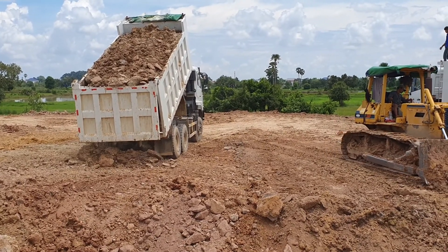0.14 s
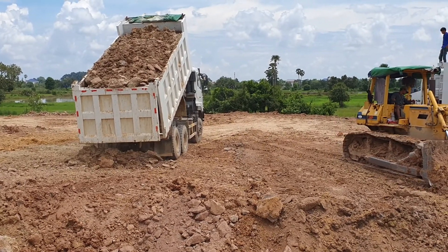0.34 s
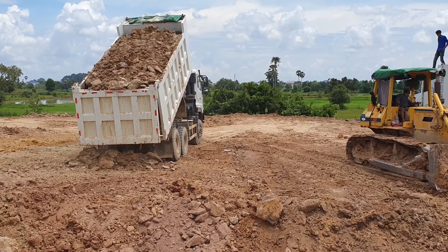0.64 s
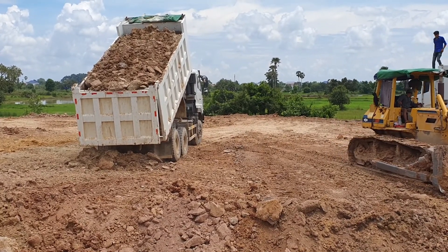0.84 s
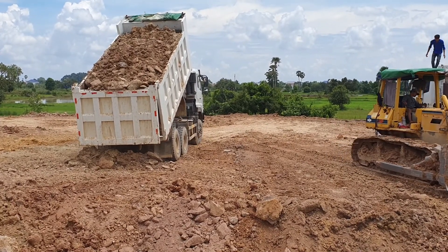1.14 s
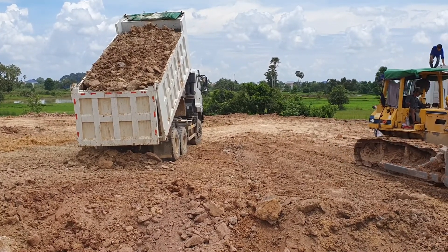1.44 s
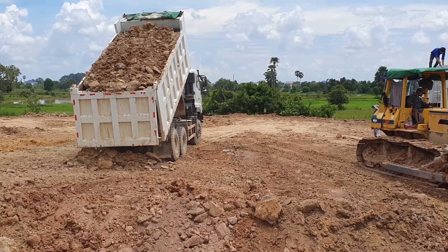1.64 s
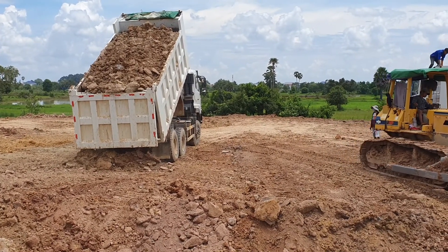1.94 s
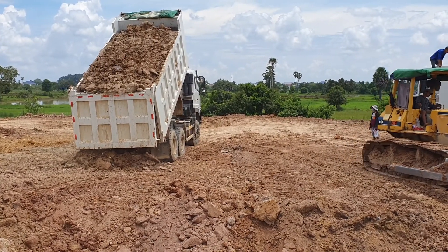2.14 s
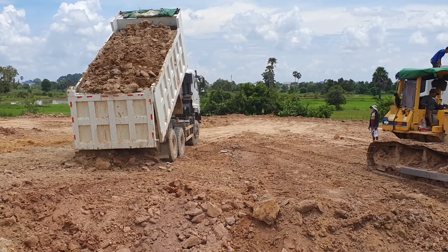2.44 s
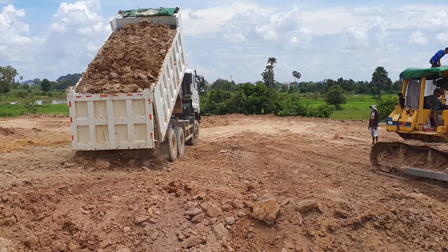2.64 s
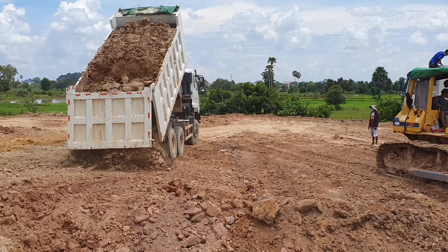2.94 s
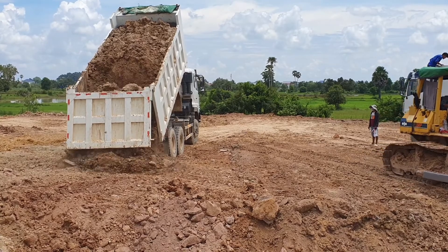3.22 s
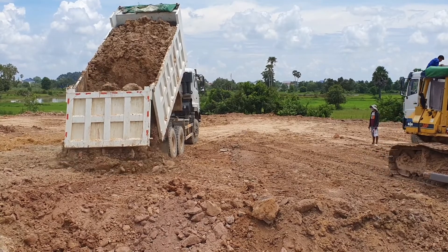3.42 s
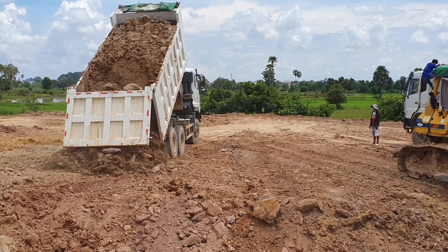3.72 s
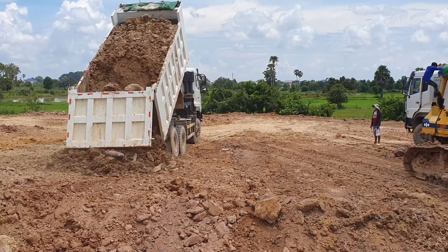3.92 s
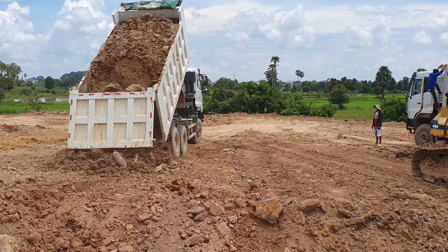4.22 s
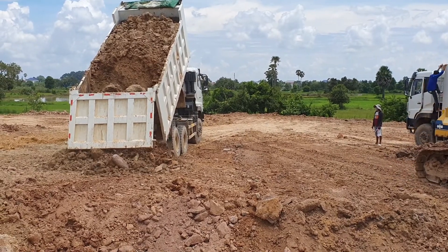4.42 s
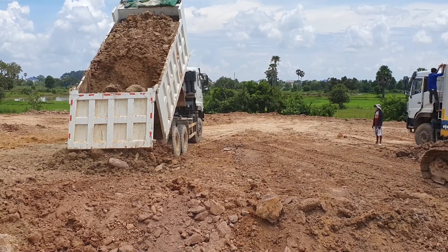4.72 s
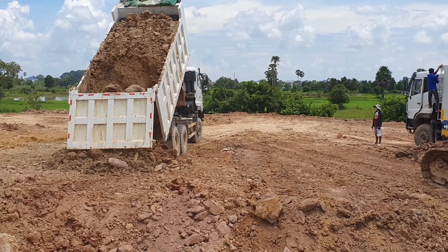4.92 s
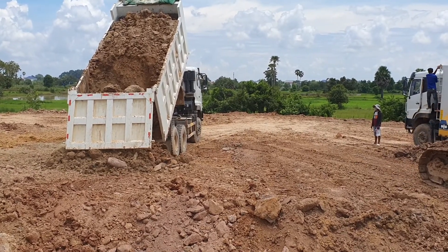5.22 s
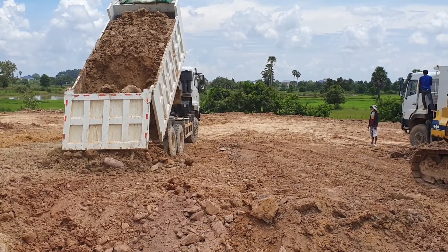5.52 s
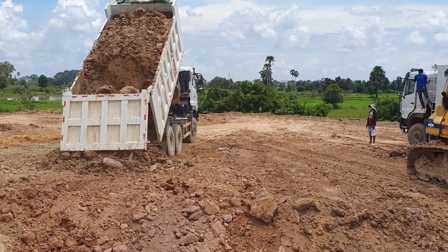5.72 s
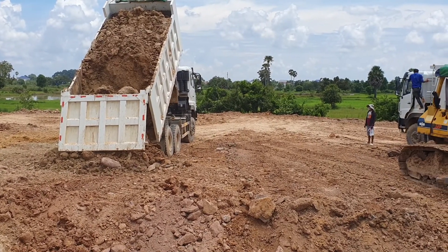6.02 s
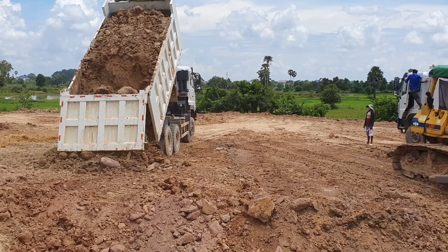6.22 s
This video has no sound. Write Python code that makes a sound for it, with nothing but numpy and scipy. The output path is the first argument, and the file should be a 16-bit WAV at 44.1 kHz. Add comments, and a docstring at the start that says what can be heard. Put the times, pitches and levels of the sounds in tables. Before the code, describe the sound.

Steady diesel drone on an open dirt field: low exhaust boom, rough bark, clatter and light hiss from a crawler, with a tipper truck's rumble and faint whine underneath. Revs creep up, the boom cuts out and the pitch slides down, then the note returns abruptly and climbs gradually. Faint dry track whistles, a few dull clanks and tiny gritty scrapes are mixed in. Stereo pickup, dry, with faint treble noise.

```python
"""A bulldozer's six-cylinder diesel drones on an earth fill while a tipper truck runs beside it.
Its throttle shuts and it runs down almost without exhaust note as it turns away; then it picks up under load.
Speed, fuel and heading set the bark, roar and clatter; overtones sweep through pipe and panel resonances.
The truck is rumbling noise with a drone and a whine; the tracks whistle by stick-slip, clank and scrape.
All is in the open air, with only weak, close reflections, over a faint treble noise floor."""
import sys
import numpy as np
from scipy.fft import rfft, irfft, next_fast_len
from scipy.io import wavfile
from scipy.ndimage import uniform_filter1d, minimum_filter1d, map_coordinates

SR = 44100
rng = np.random.default_rng(int(sys.argv[2]) if len(sys.argv) > 2 else 0)


def pcm_store(signal):
    """Save signal as 16-bit PCM."""
    levels = np.round(np.clip(np.atleast_2d(signal), -1, 1) * 32767)
    wavfile.write(sys.argv[1], SR, levels.astype(np.int16).T)


N = 280476

# Spectra of the noises, relative levels: frequency_hz, level_db
TREBLE_FLOOR_SPECTRUM = [(7000, -6.5), (8300, -3), (9200, -4), (11300, -6), (12600, -0.5), (14500, -3.5),
                         (15700, -2.5)]
TRUCK_SPECTRUM = [(20, -28), (36, -5), (52, -7.5), (78, 2), (110, -12), (150, -10.5), (220, -12.5),
                  (330, -21)]
LINK_SPECTRUM = [(300, -18), (600, -4), (900, 8), (1300, 2), (2000, -0.5), (3200, -17), (6000, -31),
                 (12000, -40)]
GRIT_SPECTRUM = [(700, -6), (1500, 6), (2300, -2), (3100, 6), (4200, -9), (5300, -10), (6300, 0),
                 (7050, 4.5), (7700, -25), (10000, -17), (15000, -26)]
ROAR_SPECTRUM = [(150, -1.5), (200, -0.5), (250, -2.5), (280, -3.5), (325, -2), (385, -7), (490, -6.5),
                 (560, -6), (750, -9.5), (1000, -16), (1400, -38)]
CLATTER_SPECTRUM = [(700, -15), (1050, -3.5), (1250, -0.5), (1550, -8), (2000, -3), (2300, -11), (2900, -5),
                    (3800, -9.5), (4500, -14.5), (5300, -20.5), (8000, -40)]
HISS_SPECTRUM = [(4000, -12), (5200, -12.5), (6000, -2), (6900, -1), (7600, -8.5), (8400, -19),
                 (11000, -14)]

# Likeness of the two microphones' noise: frequency_hz, correlation (no unit)
LIKENESS = [(200, 1), (400, 0.94), (600, 0.85), (1300, 0.58), (2300, 0.043), (3600, 0.14), (7000, 0.059),
            (14000, 0.12)]
# Balance of the two microphones: frequency_hz, left_minus_right_db
BALANCE = [(60, 2), (110, -2.5), (200, -0.5), (380, 0), (700, -2.0), (1290, -3), (2380, 0), (4400, -7),
           (8120, -1), (15000, -0.5)]
# Later arrival of truck, exhaust and panels at the left microphone: frequency_hz, lag_ms
LOW_LAG = [(80, 0.46), (160, 0.21), (400, 0.32)]

# Clanks of the track links, relative levels: start_s, level_db
CLANKS = [(.468, -26), (.828, -28), (3.167, -27), (3.763, -26), (4.005, -26), (5.938, -21), (6.116, -18.5)]
# Steel grinding over grit, relative levels: centre_s, half_length_s, level_db
SCRAPES = [(2.12, 0.012, -39), (2.743, 0.013, -30), (6.008, 0.022, -46)]
# Whistles of the track pins, relative levels: start_s, length_s, starting_pitch_hz, level_db
SQUEALS = [(2.12, .048, 8020, -37), (2.261, .07, 3920, -42), (2.462, .07, 3990, -42),
           (2.763, .064, 8060, -38), (3.16, .08, 4000, -41.5), (4.16, .07, 4000, -43),
           (4.26, .11, 4010, -39), (4.456, .14, 4015, -40), (4.68, .14, 4010, -43), (5.65, .041, 8000, -46),
           (5.701, .14, 3868, -35), (5.97, .098, 3908, -31.5), (6.085, .055, 3940, -38),
           (6.138, .145, 3893, -34.5), (6.283, .09, 3848, -32)]
# Direction of the whistles: pitch_hz, left_minus_right_db
SQUEAL_PAN = [(4000, -6.5), (8000, -10)]
RANDOM_CLANK_DB = -26  # relative, on the scale of CLANKS
SAG_HZ_PER_S = 210  # a squeal sinks as the pin slides

# Resonances of body panels: centre_hz, width_hz, peak_db
PANELS = [(271.5, 10.7, -25.5), (336.9, 8.3, -26.5), (383, 19, -34.5), (601, 11, -32)]
# Engine shake that drives the panels: multiple_of_firing_rate, level_db
PANEL_DRIVE = [(4, 0), (5, -4), (7, -3)]
# Resonances of the engine casing, relative levels: centre_hz, width_hz, peak_db
CASING = [(1184, 66, -5), (1306, 54, -2.5), (1908, 128, -3), (3100, 110, -16)]
# Resonances of the exhaust pipe: centre_hz, width_hz, gain_far_below_centre_db
PIPE = [(174.3, 29, -3), (393, 51, -20), (569, 45, -35.5)]
# Exhaust overtones, thirds from unequal cylinders: multiple_of_firing_rate, level_db
OVERTONES = [(4 / 3, -14), (5 / 3, -9), (2, 0), (7 / 3, -9), (8 / 3, -13), (3, -1), (4, -1), (5, 0),
             (6, -3), (7, -3)]
# Uneven beat of unequal cylinders: multiple_of_firing_rate, level_re_boom_db
LOPE = [(2 / 3, -26.5), (5 / 6, -29)]

# Engine speed at work, running down and picking up: time_s, firings_per_s
SPEED = [(0, 81.2), (.4, 79.6), (.9, 79.7), (1.1, 78.2), (1.7, 81.7), (2, 79), (2.4, 83), (3.2, 87.5),
         (3.5, 88), (3.75, 76), (4.05, 67.5), (4.38, 55.5), (4.55, 61.7), (4.8, 68), (5.6, 74.6),
         (6.36, 79)]
# Throttle shut: from_s, to_s
COAST = (3.51, 4.41)
# Engine bay swinging away from the listener: from_s, to_s
TURN = (3.4, 3.5)
# Boom under load before and after the run-down, relative levels: time_s, level_db
BOOM_BEFORE = [(0.05, -9), (2.15, -9.5), (2.17, -10.5), (2.88, -8), (3.48, -12.5)]
BOOM_AFTER = [(4.42, -13), (4.462, -7), (4.52, -10), (4.748, -5.5), (6.126, -11), (6.33, -10.5)]
# Courses of the casing's ring and the hiss, relative levels: time_s, level_db
RING_COURSE = [(0.05, -37.5), (0.68, -38), (3.16, -39.5), (3.42, -35), (3.65, -42), (5.82, -56), (5.9, -45)]
HISS_COURSE = [(0.0, -43.5), (1.17, -41.5), (1.31, -43), (2.34, -42), (3.83, -52), (5.1, -45.5),
               (5.24, -48.5), (6.36, -47.5)]
# Level rules: working_speed_db, slope_db_per_octave_of_speed, coasting_change_db, turned_away_change_db
TREBLE_FLOOR_LAW = (-47.5, -5, -2.5, 1)
ROAR_LAW = (-24, 2.5, -0.3, -2.5)
CLATTER_LAW = (-31, -1.5, -1.9, -1)
BARK_LAW = (-30, 1.5, -11, 0.5)  # ahead of the pipe's resonances
WORK_HZ = 80  # working speed, firings per second
SHUT_S, OPEN_S = 0.082, 0.052  # time for the fuel to die away, and to come back
BOOM_LEVEL_DB = 0.28  # constant level added to the boom's course
TOP_HZ = 15700  # upper band limit of the recorder


def amp(db):
    """Logarithmic levels: decibels become a linear gain."""
    return 10 ** (np.asarray(db) / 20)


def unit(x):
    """Normalization: scale to rms 1."""
    return x / np.sqrt(np.mean(x ** 2) + 1e-20)


def clock():
    """Sampling: the time of each sample in seconds."""
    return np.arange(N) / SR


def ramp(start, length):
    """Linear transition: rises from 0 to 1 over a stretch of time."""
    return np.clip((clock() - start) / length, 0, 1)


def along(points, hz):
    """Interpolation of (frequency_hz, value) points on a logarithmic frequency axis."""
    point_hz, value = np.transpose(points)
    return np.interp(np.log(hz + 1), np.log(point_hz + 1), value)


def curves(rows):
    """Interpolation in time: one value per sample for each column after the time."""
    s, *columns = np.transpose(rows)
    return [np.interp(clock(), s, column) for column in columns]


def wobble(rate):
    """Slow random modulation: a smooth curve with the given number of knots a second."""
    knots = rng.standard_normal(int(N * rate / SR) + 4)
    return map_coordinates(knots, [clock() * rate])


def filtered(x, response):
    """Linear filtering: the spectrum is multiplied by a response of frequency."""
    m = next_fast_len(N + 8192)
    hz = np.fft.rfftfreq(m, 1 / SR)
    return irfft(rfft(x, m) * response(hz), m)[..., :N]


def shape(points):
    """Spectral envelope: the gain follows the points and falls away outside their ends."""
    low, high = points[0][0], points[-1][0]

    def response(hz):
        skirts = np.minimum(hz / low, 1) ** 2 / np.maximum(hz / high, 1) ** 2
        return amp(along(points, hz)) * skirts
    return response


def resonances(modes, hz):
    """Modal superposition: damped resonances of alternating sign add."""
    total = 0
    for k, (centre, width, db) in enumerate(modes):
        damping = 1j * hz * width
        total = total + (-1) ** k * amp(db) * damping / (centre ** 2 - hz ** 2 + damping)
    return total


def rush(response, drive=1):
    """Partial coherence: driven noise through a response, alike at two microphones by frequency, at rms 1."""
    def middle_and_side(hz):
        angle = np.arccos(np.clip(along(LIKENESS, hz), -1, 1)) / 2
        return response(hz) * np.array([np.cos(angle), np.sin(angle)])

    mid, side = filtered(drive * rng.standard_normal((2, N)), middle_and_side)
    pair = np.array([mid + side, mid - side])
    return unit(filtered(pair, lambda hz: amp(np.outer([.5, -.5], along(BALANCE, hz)))))


def band(centre_hz, width_hz):
    """Narrow-band excitation: noise in one resonance, at rms 1."""
    return rush(lambda hz: 1 / (1 + ((hz - centre_hz) / width_hz) ** 2))


def bounced(x, gain, reach, count=12):
    """Early reflection: ground, blade and tipper body add weak, close copies; the sum has rms 1."""
    delays = rng.uniform(.002, reach, count)
    sizes = gain * rng.standard_normal(count)
    echoes = sum(size * np.roll(x, int(delay * SR), axis=-1) for delay, size in zip(delays, sizes))
    return unit(x + echoes)


def spread(x, lag_ms):
    """Arrival-time difference: sound from the right reaches the left microphone later, by frequency."""
    return filtered(x, lambda hz: np.exp(1j * np.pi * np.outer([-1, 1], hz * lag_ms(hz)) / 1000))


def level(law, state, wander_db):
    """Level scaling: one layer's gain from engine speed, fuel and heading, with a slight random wander."""
    db, octave_db, coast_db, turned_db = law
    speed, fuel, turned = state
    speed_db = octave_db * np.log2(speed / WORK_HZ)
    return amp(db + speed_db + coast_db * (1 - fuel) + turned_db * turned + wander_db * wobble(14))


def treble_floor(state):
    """Level-following noise: a faint treble floor varies with the engine's speed, fuel and heading."""
    noise = rush(shape(TREBLE_FLOOR_SPECTRUM), amp(1.7 * wobble(500)))
    return level(TREBLE_FLOOR_LAW, state, wander_db=2.05) * bounced(noise, gain=0.11, reach=0.0092)


def truck(level_db, drone_db, swell_db, swell_at, swell_s, whine_db):
    """Broadband and resonant radiation: engine rumble, hoist pump whine, a drone swelling near full tilt."""
    drone = amp(drone_db + swell_db * ramp(swell_at, swell_s)) * band(centre_hz=385, width_hz=19.5)
    whine = amp(whine_db) * band(centre_hz=1328, width_hz=9)
    return amp(level_db) * rush(shape(TRUCK_SPECTRUM)) + drone + whine


def tracks(clank_db, t60, scrape_db, count=6):
    """Impact and friction: earth-clogged links clank dully, and now and then grind over a stone."""
    t = clock()
    # further clanks, at one common level, fall at random moments
    clanks = CLANKS + [(s, RANDOM_CLANK_DB) for s in rng.uniform(0, N / SR, count)]
    hits = sum(ramp(s, .001) * amp(db - 60 * np.abs(t - s) / t60) for s, db in clanks)
    strokes = sum(amp(db) / (1 + ((t - s) / half) ** 2) for s, half, db in SCRAPES)
    clanking = amp(clank_db) * hits * rush(shape(LINK_SPECTRUM))
    grinding = amp(scrape_db) * strokes * rush(shape(GRIT_SPECTRUM), amp(2.9 * wobble(320)))
    return clanking + grinding


def squeals(level_db, jitter, octave_db):
    """Stick-slip friction: dry track pins whistle briefly, swell, waver and sag, with a weak octave."""
    out = np.zeros((2, N))
    drift = 1 + jitter * wobble(90)
    flutter = unit(amp(2.5 * wobble(45)))
    for s, length, hz, db in SQUEALS:
        stroke = ramp(s, length)
        pan_db = along(SQUEAL_PAN, hz)
        pitch_hz = (hz - SAG_HZ_PER_S * length * stroke) * drift
        angle = 2 * np.pi * np.cumsum(pitch_hz) / SR
        tone = np.sqrt(2) * (np.sin(angle) + amp(octave_db) * np.sin(2 * angle))
        swell = np.abs(np.sin(np.pi * stroke)) ** 0.25
        out += amp([[db + pan_db / 2], [db - pan_db / 2]]) * swell * flutter * tone
    return amp(level_db) * out


def hums(firings, waver, flicker_db):
    """Forced vibration: engine shake sweeps through the panels' resonances, also while the engine coasts."""
    shake = 0
    for order, db in PANEL_DRIVE:
        strength = amp(db + flicker_db * wobble(10))
        shake = shake + strength * np.cos(2 * np.pi * order * firings + waver * wobble(17))
    return np.sqrt(2) * filtered(shake, lambda hz: resonances(PANELS, hz))


def blows(firings, decay, pattern_db, scatter_db, steady):
    """Periodic excitation: a dying burst per firing over a steady part; each of six cylinders has its strength."""
    index = firings.astype(int)
    cylinder_db = pattern_db * rng.standard_normal(6)[index % 6]
    cycle_db = scatter_db * rng.standard_normal(1024)[index % 1024]
    bursts = amp(cylinder_db + cycle_db) * np.exp(-(firings % 1) / decay)  # decay in firing periods
    return unit(steady + unit(bursts))


def casing(hz):
    """Structural resonance: the modes of the engine block and its covers."""
    return resonances(CASING, hz)


def engine(firings, state):
    """Modulated noise: gas roar, combustion clatter, casing ring and intake hiss pulse with the firings."""
    puffs = blows(firings, decay=0.56, pattern_db=1.5, scatter_db=1.5, steady=3.9)
    knocks = blows(firings, decay=0.51, pattern_db=9.0, scatter_db=1, steady=7.1)

    roar = level(ROAR_LAW, state, wander_db=0.46) * rush(shape(ROAR_SPECTRUM), puffs)

    clatter = bounced(rush(shape(CLATTER_SPECTRUM), knocks), gain=0.097, reach=.03)
    clatter = level(CLATTER_LAW, state, wander_db=0.74) * clatter

    ring = bounced(rush(casing, knocks), gain=0.1, reach=0.033)
    ring = amp(curves(RING_COURSE)[0] + 6.0 + 1.3 * wobble(15)) * ring

    hiss = bounced(rush(shape(HISS_SPECTRUM), knocks), gain=0.11, reach=0.012)
    hiss = amp(curves(HISS_COURSE)[0] + 4.0 + 1.24 * wobble(18)) * hiss
    return roar + clatter + ring + hiss


def pipe(hz):
    """Duct resonance: the exhaust pipe lifts whichever overtone passes through its modes."""
    return sum(amp(db) * c * c / (c * c - hz * hz + 1j * hz * w) for c, w, db in PIPE)


def exhaust(firings, state, boom_db, waver, waver_db, lag):
    """Harmonic radiation: fed with fuel, the pipe booms at the firing rate; overtones bark at its resonances."""
    angle, fuel = 2 * np.pi * firings, state[1]
    boom = np.cos(angle) * amp(0.092 * wobble(33))
    for order, db in LOPE:
        boom = boom + amp(db) * np.cos(order * (angle + rng.uniform(0, 12 * np.pi)))
    # overtones trail the boom; the higher they are, the less alike their cycles
    gas = 0
    for order, db in OVERTONES:
        strength = amp(db + waver_db * order * wobble(12))
        gas = gas + strength * np.cos(order * (angle - lag) + waver * order ** 2 * wobble(18))
    bark = level(BARK_LAW, state, wander_db=0.5) * filtered(gas, pipe)
    return np.sqrt(2) * fuel * (amp(boom_db + BOOM_LEVEL_DB) * boom + bark)


def scene():
    """Superposition: speed, fuel and heading drive the engine's layers; all layers reach the right first."""
    speed, = curves(SPEED)
    boom_db, = curves(list(BOOM_BEFORE) + list(BOOM_AFTER))
    fuel = 1 - ramp(COAST[0], SHUT_S) + ramp(COAST[1] - OPEN_S, OPEN_S)
    turned = ramp(TURN[0], TURN[1] - TURN[0])
    firings = np.cumsum(speed * (1 + 0.001 * wobble(12))) / SR  # running count of firings
    state = speed, fuel, turned

    tipper = truck(level_db=-25.0, drone_db=-37.5, swell_db=6, swell_at=4.61, swell_s=0.75, whine_db=-43)
    crawler = tracks(clank_db=1, t60=0.063, scrape_db=10.0)
    crawler = crawler + squeals(level_db=-0.5, jitter=0.00365, octave_db=-26)
    note = hums(firings, waver=0.57, flicker_db=2)
    note = note + exhaust(firings, state, boom_db, waver=0.013, waver_db=0.69, lag=0.32)

    low_sources = spread(note + tipper, lambda hz: along(LOW_LAG, hz))
    noises = treble_floor(state) + engine(firings, state) + crawler
    return low_sources + spread(noises, lambda hz: 0.2224)


def record(dry):
    """Limiting and band limitation: peaks near full scale are turned down, and the top of the band cut off."""
    needed = np.minimum(1, .96 / (np.abs(dry).max(axis=0) + 1e-9))
    gain = uniform_filter1d(minimum_filter1d(needed, size=SR // 25), size=SR // 25)
    return filtered(dry * gain, lambda hz: hz < TOP_HZ)


dry = scene()
out = record(dry)
pcm_store(out)
```